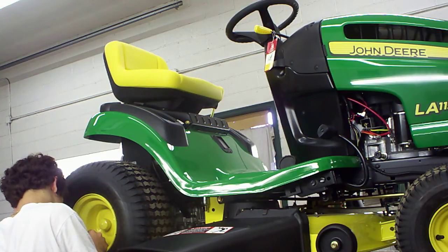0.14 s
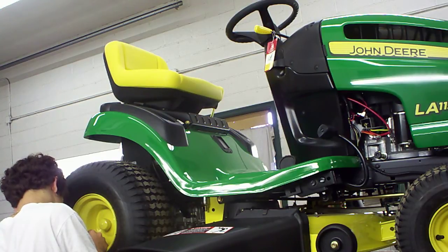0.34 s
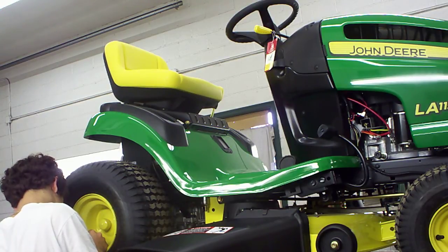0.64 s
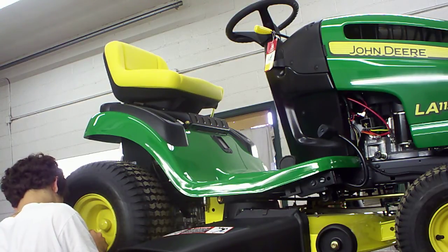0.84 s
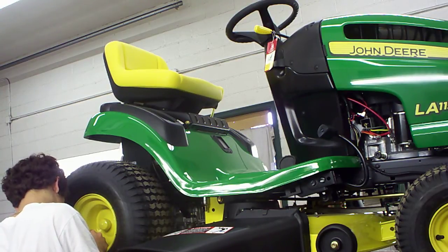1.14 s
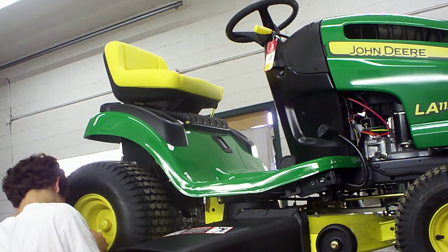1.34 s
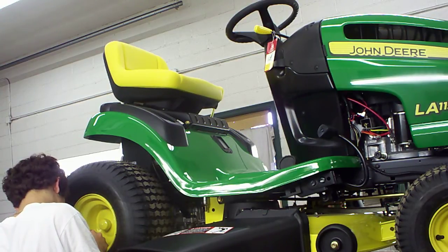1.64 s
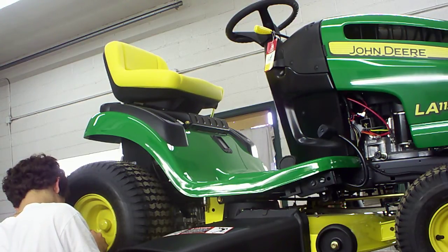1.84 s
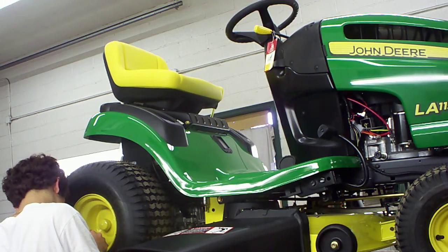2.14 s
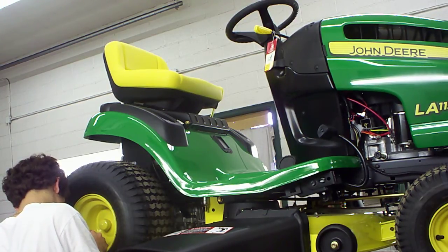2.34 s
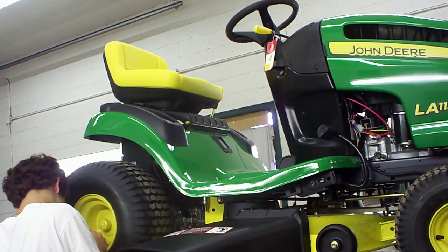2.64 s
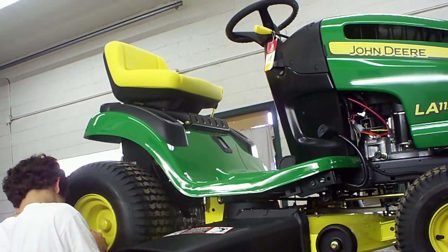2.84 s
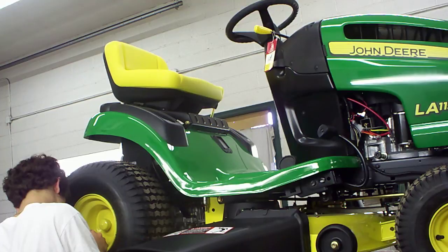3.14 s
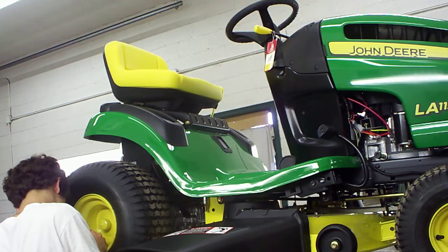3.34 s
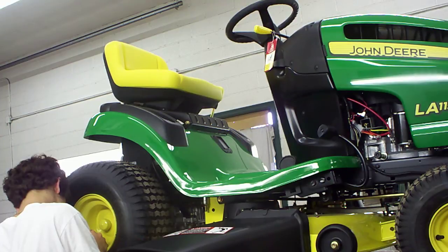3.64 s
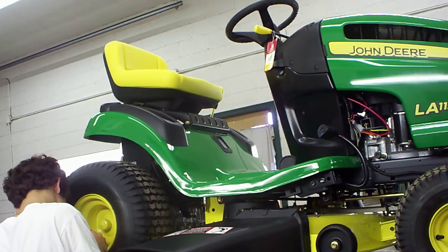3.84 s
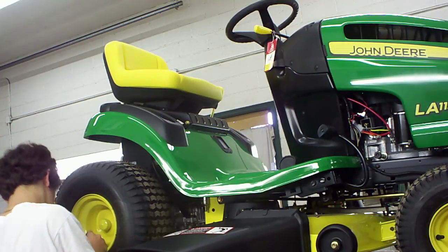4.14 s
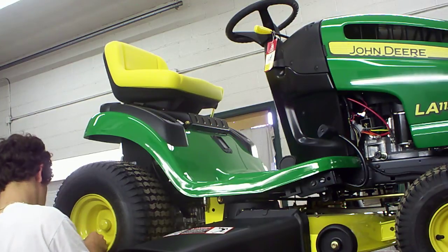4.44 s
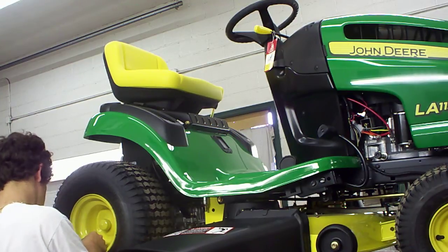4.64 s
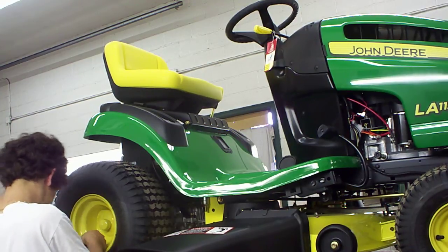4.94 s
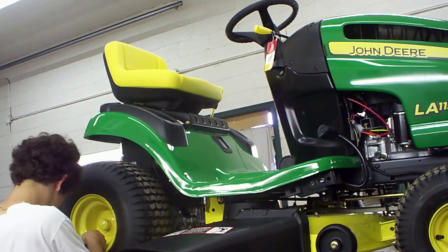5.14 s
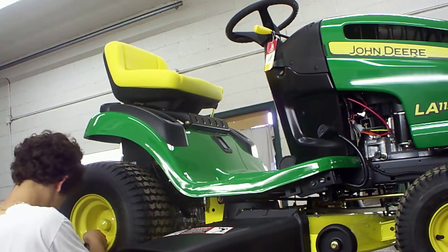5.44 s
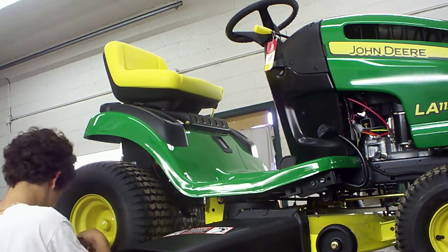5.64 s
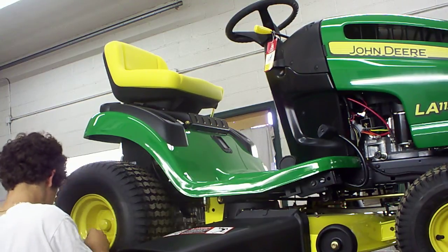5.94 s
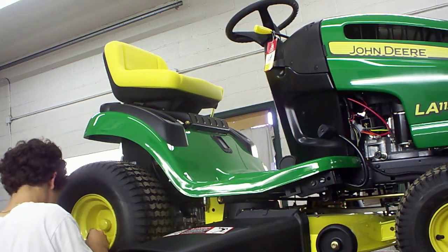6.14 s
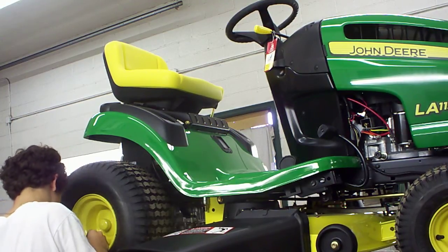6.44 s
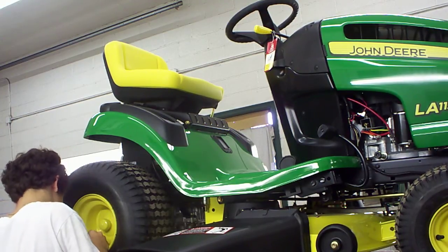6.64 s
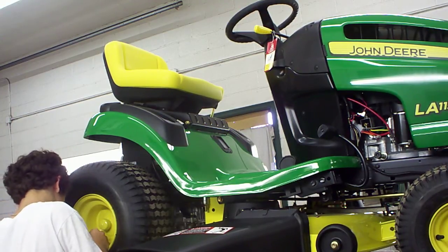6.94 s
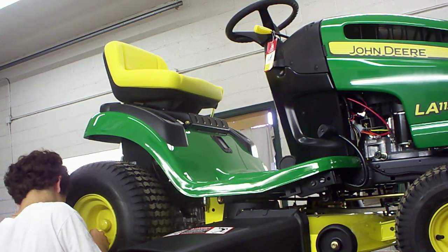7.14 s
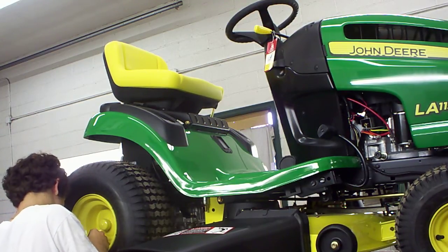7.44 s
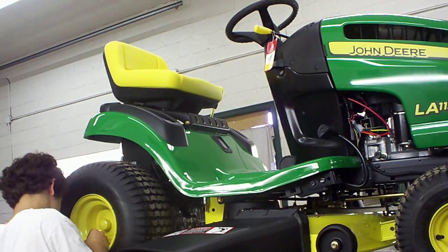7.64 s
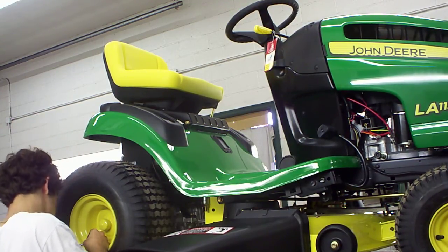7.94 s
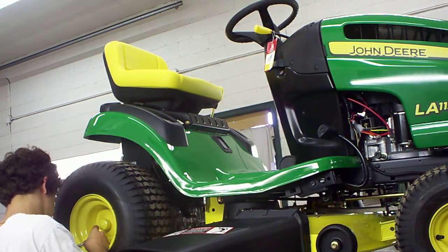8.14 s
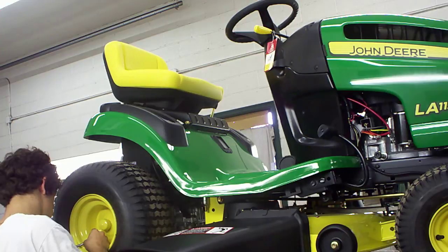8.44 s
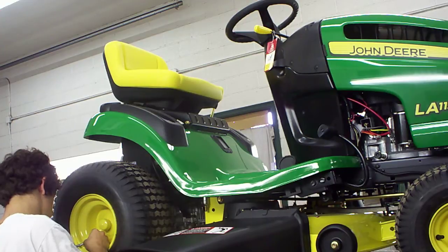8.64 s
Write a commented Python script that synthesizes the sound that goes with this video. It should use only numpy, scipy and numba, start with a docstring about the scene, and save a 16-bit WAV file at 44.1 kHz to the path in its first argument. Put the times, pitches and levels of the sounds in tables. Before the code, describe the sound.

A high, slightly rough hiss of air from a tire valve is already running at the start. It slowly weakens, surges briefly at about 4 seconds and cuts off. In the pause the room remains: a low hum of ventilation motors that pulses slowly, with electrical hum and a soft rush of moving air, all present from beginning to end. At about 5.5 seconds the valve gives one small spit of air with a soft fingertip rub. Two faint metallic ticks of the valve pin follow at 6.5 and 6.8 seconds. Right afterwards a second, stronger hiss starts, swells a little around 7.5 and 8.5 seconds, and lasts until the end, near 9 seconds. The small microphone is fairly close to the valve, and the workshop's hard walls add a short echo.

```python
"""Letting down a tyre in a workshop

Between block walls, air jets from a tyre valve: a long hiss, a pause with one small spit and two faint
ticks of the pin, then a second, stronger hiss. In the background two ventilation motors beat slowly
against each other over mains hum and moving air. The microphone is a small camera's, deaf near 4 kHz
and above 9 kHz, close enough to the valve that the direct sound just outweighs the room."""
import sys
import numpy as np
from scipy import signal
from scipy.fft import rfft, irfft
from scipy.io import wavfile
from numba import njit

SR = 44100
rng = np.random.default_rng(int(sys.argv[2]) if len(sys.argv) > 2 else 0)


def generate_wav(sig):
    """Save sig (samples, or channels by samples) to the path in sys.argv[1] as 16-bit PCM at SR."""
    pcm = np.round(np.clip(np.atleast_2d(sig).T, -1, 1) * 32767).astype(np.int16)
    wavfile.write(sys.argv[1], SR, pcm)


N = 387198
TIME = np.arange(N) / SR
FREQ = np.fft.rfftfreq(N, 1 / SR) + 1e-3
CAMERA_RATE_HZ = 16000

# presses of the valve pin: (start [s], end [s], first flow [dB], held flow [dB],
# depth [0 partly in, 1 fully in], sputter [dB], flutter [dB])
PIN_PRESSES = [(-.05, 4.075, -31, -36, 0, 0.94, 0.37), (5.485, 5.655, -50.5, -52, 0, 2.2, 2),
               (6.849, 8.9, -31.5, -27.5, 1, 1, .5)]
# the finger bears down harder: (centre [s], length [s], flow gain [dB])
FINGER_SQUEEZES = [(4.005, 0.22, 5), (5.533, .03, 11.5), (7.523, 0.49, 2), (8.497, .07, 2.7)]
# colour of the jet, pin partly in and fully in: (frequency [Hz], relative level [dB])
NARROW_JET_SPECTRUM = [(500, -33.5), (1200, -14), (1900, -15), (2900, -13), (3700, -16.5), (4700, -13),
                       (5500, -8), (6200, -4.5), (6800, 2), (7400, 4.5), (8000, -2)]
WIDE_JET_SPECTRUM = [(500, -31), (1000, -22.5), (1400, -10.5), (1750, -18.5), (2300, -14), (3600, -18.5),
                     (4700, -16), (5400, -10), (6000, -5), (6700, 1.5), (7400, 2), (8000, -4)]
# peaks and dips from the stem and the dished wheel behind it: (frequency [Hz], width [Hz], gain [dB])
WHEEL_COLOUR = [(1725, 69, -11), (4760, 250, 1), (6030, 160, 2.5), (7100, 160, 1.5), (7110, 130, -4),
                (7380, 160, 0)]
# hum of the nearer motor: (harmonic [multiple of shaft rate], level [dB])
MOTOR_HARMONICS = [(1, -25.5), (2, -46.5), (3, -53.5), (4, -62), (5, -62), (6, -64.5), (9, -64.5),
                   (10, -53.5), (11, -66), (12, -63), (19, -66.5)]
# how much slower the farther motor turns: (time [s], beat rate [Hz])
MOTOR_BEATS = [(0.0, 1.204), (2.2, 1.648), (3.4, 1.255), (5.8, 1.64), (6.2, 1.254), (8.78, 0.98)]
# mains hum, fan tones and a thin electronic whine: (frequency [Hz], level [dB])
HUM_TONES = [(28.14, -48), (84.4, -54), (112.4, -55.5), (120, -51), (140.7, -51.5), (240, -52),
             (269, -60.5), (297, -58.5), (338.5, -59), (360, -64), (590, -65), (7714, -63)]
# air moving in the ducts and the room: (frequency [Hz], relative level [dB])
AIR_SPECTRUM = [(15, -4.5), (75, -1), (100, -4.5), (122, -1.5), (152, -14), (200, -8), (320, -10),
                (420, -13), (600, -10), (850, -16), (1700, -19.5), (2300, -20), (3300, -27.5),
                (5000, -30.5), (6500, -26.5), (8000, -28.5)]
# brief low drones, and a rumble of air gusting on the microphone:
# (centre [s], length [s], frequency [Hz], level [dB])
LOW_SWELLS = [(1.33, 0.5, 126, -37.5), (2.0, 0.34, 21, -36), (3.606, 0.74, 76.1, -50)]
# the pin touches the stem: (time [s], relative level [dB])
PIN_TICKS = [(6.505, -40), (6.797, -48.5)]
# the camera's smoothing filter, sloping through half its sample rate: (frequency [Hz], gain [dB])
CAMERA_SMOOTHING = [(7000, 0), (7500, -2), (8000, -3), (8285, -10.5), (8500, -17.5), (8750, -25.5),
                    (9000, -38.5), (9200, -58)]


def undb(db):
    """Decibels to gain."""
    return 10 ** (np.asarray(db) / 20)


def unit(x):
    """Scale to rms 1."""
    return x / np.sqrt(np.mean(x ** 2))


def filtered(x, gain):
    """Apply a gain at every frequency."""
    return irfft(rfft(x) * gain, N)


def response(points):
    """Gain at every frequency along (frequency [Hz], level [dB]) points."""
    hz, db = np.transpose(points)
    return undb(np.interp(np.log(FREQ), np.log(hz), db))


def colour(x, points):
    """Shape x by a spectrum within the camera's band, at rms 1."""
    return unit(filtered(x, response(points) * (FREQ < CAMERA_RATE_HZ / 2)))


def peak(hz, width_hz):
    """A resonance curve of height 1, given its full width at half height."""
    return 1 / (1 + (2 * (FREQ - hz) / width_hz) ** 2)


def walk(rate_hz):
    """Smooth random motion up to a rate, at rms 1."""
    return unit(filtered(rng.standard_normal(N), 1 / (1 + (FREQ / rate_hz) ** 4)))


def swell(centre_s, length_s):
    """A smooth, flat-topped rise and fall."""
    return np.exp(-(2 * (TIME - centre_s) / length_s) ** 4)


def gate(start, end, rise_s, fall_s):
    """Rise up to the start, hold, die away after the end."""
    rise = np.minimum(TIME - start, 0) / rise_s
    fall = np.maximum(TIME - end, 0) / fall_s
    return np.exp(np.maximum(rise - fall, -40))


def jet(flow, depth, sputter_db, flutter_db):
    """Turbulence at the valve: quick eddies roughen the hiss, the finger on the pin makes it waver."""
    eddies = undb(sputter_db * walk(rate_hz=500) + flutter_db * walk(rate_hz=17))
    wheel = undb(sum(db * peak(hz, width) for hz, width, db in WHEEL_COLOUR))
    turbulence = filtered(rng.standard_normal(N) * eddies, wheel)
    hiss = colour(turbulence, WIDE_JET_SPECTRUM if depth > .5 else NARROW_JET_SPECTRUM)
    # a faster jet is brighter: its lower rush grows more slowly than its top
    split_hz, usual_flow, growth = 5200, undb(-34.5), .6
    rush = filtered(hiss, 1 / (1 + (FREQ / split_hz) ** 20))
    return (hiss - rush) * flow + rush * usual_flow * (flow / usual_flow) ** growth


def valve_air(settle_s):
    """Each press opens a jet that settles towards a held flow and surges when the finger squeezes."""
    squeeze_db = sum(db * swell(centre, length) for centre, length, db in FINGER_SQUEEZES)
    out = np.zeros(N)
    for start, end, first_db, held_db, depth, sputter_db, flutter_db in PIN_PRESSES:
        settling_db = (first_db - held_db) * np.exp(-np.maximum(TIME - start, 0) / settle_s)
        opening = gate(start, end, rise_s=.0033, fall_s=.012)
        flow = opening * undb(held_db + settling_db + squeeze_db)
        out += jet(flow, depth, sputter_db, flutter_db)
    return out


def motors(shaft_hz, farther_db, waver_db, in_step_s):
    """The nearer motor hums with overtones; the farther one slips a turn behind it at every beat."""
    turns = shaft_hz * TIME
    slip = np.cumsum(np.interp(TIME, *np.transpose(MOTOR_BEATS))) / SR
    slip -= np.interp(in_step_s, TIME, slip)
    out = undb(farther_db) * np.sin(2 * np.pi * (turns - slip))
    for multiple, db in MOTOR_HARMONICS:
        is_overtone = multiple > 1  # only the overtones waver
        phase = is_overtone * (rng.uniform(0, 2 * np.pi) + .12 * walk(rate_hz=5.1))
        level = undb(db + is_overtone * waver_db * walk(rate_hz=3.2))
        out += level * np.sin(2 * np.pi * multiple * turns + phase)
    return np.sqrt(2) * out


def hum(waver_db, drift_rad):
    """Mains, fans and electronics hold steady tones that waver slightly in level and phase."""
    out = np.zeros(N)
    for hz, db in HUM_TONES:
        level = undb(db + waver_db * walk(rate_hz=4.2))
        out += level * np.sin(2 * np.pi * hz * TIME + drift_rad * walk(rate_hz=3.7))
    return np.sqrt(2) * out


def moving_air(air_db, waver_db):
    """A soft rush coloured by the walls, brief low drones, and a gust rumbling on the microphone."""
    air = colour(workshop(rng.standard_normal(N)), AIR_SPECTRUM)
    out = air * undb(air_db + waver_db * walk(rate_hz=2.5))
    for centre, length, hz, db in LOW_SWELLS:
        tone = np.sin(2 * np.pi * hz * TIME + .47 * walk(rate_hz=3.4))
        out += np.sqrt(2) * undb(db) * swell(centre, length) * tone
    return out


def finger_rub(at_s):
    """A fingertip slides off the valve stem and rubs the rim as the air spits."""
    pressure = undb(-39.5) * gate(at_s, at_s, rise_s=.016, fall_s=.05)
    body = unit(filtered(rng.standard_normal(N), peak(hz=1000, width_hz=900)))
    edge = unit(filtered(rng.standard_normal(N), peak(hz=2520, width_hz=2600)))
    return pressure * (undb(-3.5) * body + undb(-8.5) * edge)


def pin_ticks(decay_s):
    """The pin touches the brass stem, which rings very briefly in three close modes."""
    out = np.zeros(N)
    for start, db in PIN_TICKS:
        age = np.maximum(TIME - start, 0)
        ring = sum(np.sin(2 * np.pi * hz * age) for hz in (5950, 6400, 6850))
        out += undb(db) * ring * np.exp(-age / decay_s)
    return out


def workshop(x, t60_s=1, tail_db=-3.5):
    """Hard walls send a dense, fading tail to the microphone 6 ms behind the direct sound."""
    age = TIME[:SR]
    tail = rng.standard_normal(SR) * undb(-60 * age / t60_s) * (age > .006)
    reflected = signal.fftconvolve(x, tail / np.linalg.norm(tail))[:N]
    return (x + undb(tail_db) * reflected) / np.sqrt(1 + undb(tail_db) ** 2)


@njit
def follow(x, attack, release):
    """Envelope that rises and falls at separate rates."""
    out, level = np.empty(len(x)), 0.
    for i in range(len(x)):
        level += (x[i] - level) * (attack if x[i] > level else release)
        out[i] = level
    return out


def gain_control(x, threshold_db, attack_s, release_s):
    """Strong treble makes the camera turn everything down a little, the hum too."""
    treble = signal.sosfilt(signal.butter(2, 3000, "high", fs=SR, output="sos"), x)
    loudness = follow(np.abs(treble), 1 / (attack_s * SR), 1 / (release_s * SR))
    return x / np.maximum(1, loudness / undb(threshold_db))


def scene():
    """At the microphone: the valve and its ring off the walls, over the room tone."""
    valve = valve_air(settle_s=1.3) + finger_rub(at_s=5.533) + pin_ticks(decay_s=.0044)
    room_tone = motors(shaft_hz=57.66, farther_db=-36, waver_db=.26, in_step_s=.6)
    room_tone += hum(waver_db=1.46, drift_rad=.4)
    room_tone += moving_air(air_db=-42, waver_db=.16)
    return (undb(-2) * workshop(valve) + room_tone)[None]


def record(dry):
    """The camera's mono microphone: a notch near 4 kHz, faint self-noise, gain control, slow sampling."""
    notch = undb(-22 * peak(hz=4186, width_hz=377))
    self_noise = undb(-58.5) * rng.standard_normal(N)
    microphone = filtered(filtered(dry[0], notch) + self_noise, FREQ < CAMERA_RATE_HZ / 2)
    levelled = gain_control(microphone, threshold_db=-26.5, attack_s=.012, release_s=1)
    # sampling mirrors the top of the hiss upwards; the leaking image makes that edge gritty
    sampled = levelled * (1 + 2 * np.cos(2 * np.pi * CAMERA_RATE_HZ * TIME))
    smoothed = filtered(sampled, response(CAMERA_SMOOTHING))
    top_cut = signal.ellip(10, .2, 80, 9100, fs=SR, output="sos")
    return signal.sosfilt(top_cut, smoothed)[None]


dry = scene()
out = record(dry)
generate_wav(out)
```